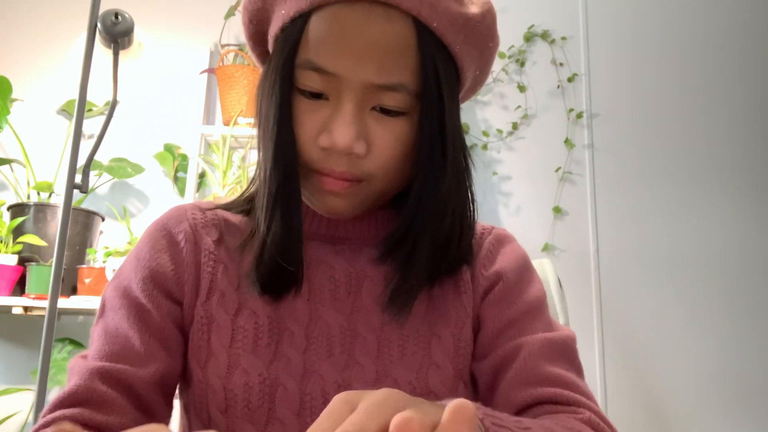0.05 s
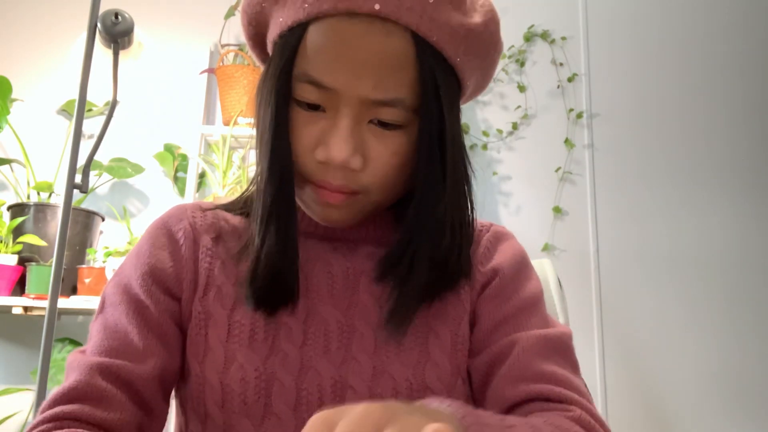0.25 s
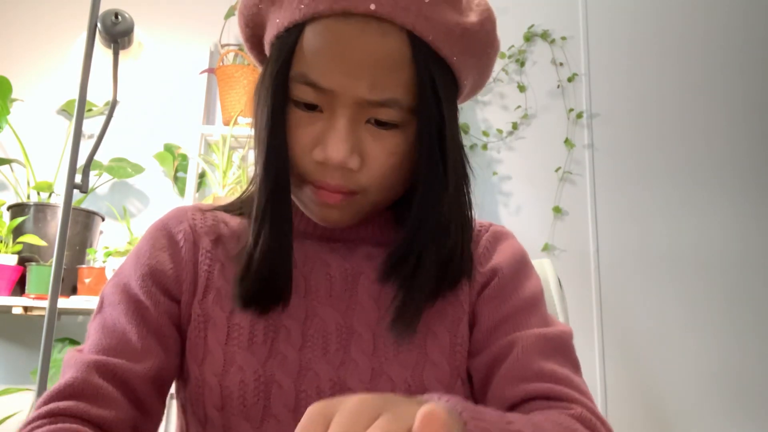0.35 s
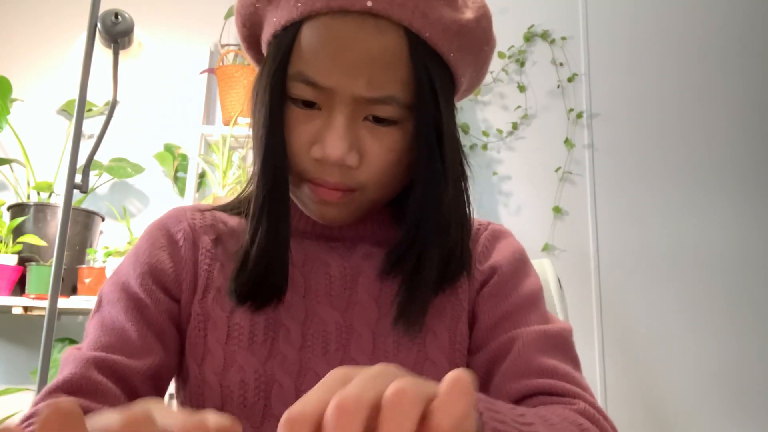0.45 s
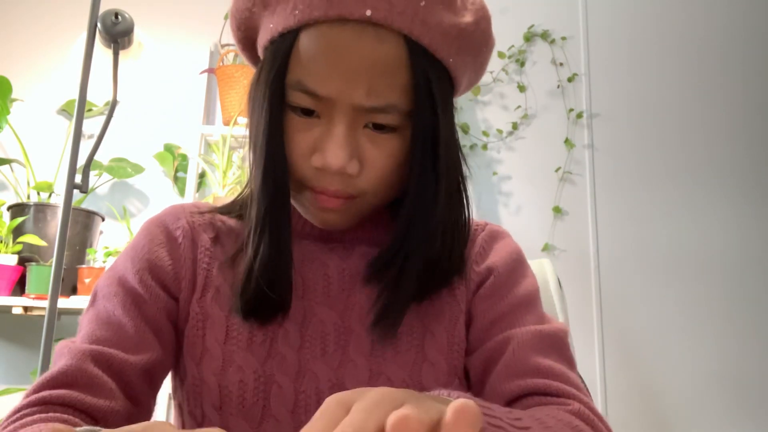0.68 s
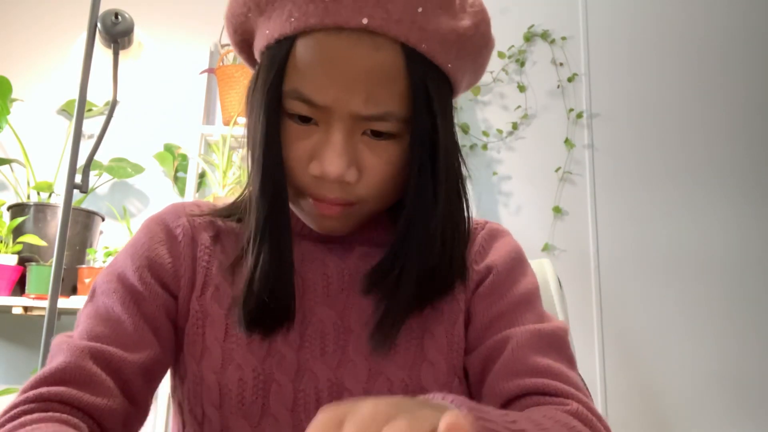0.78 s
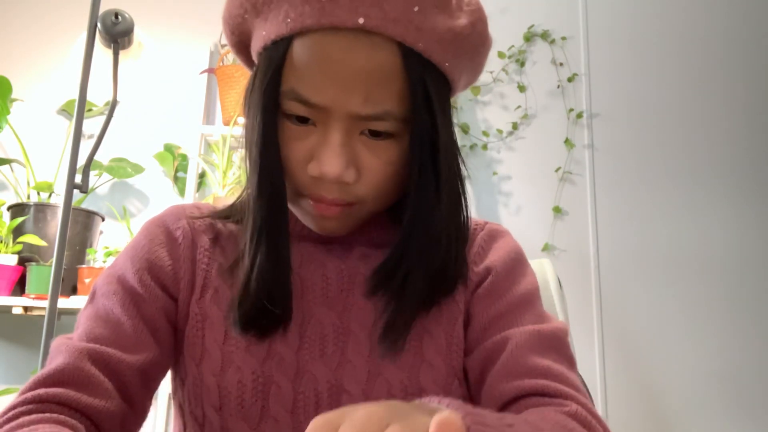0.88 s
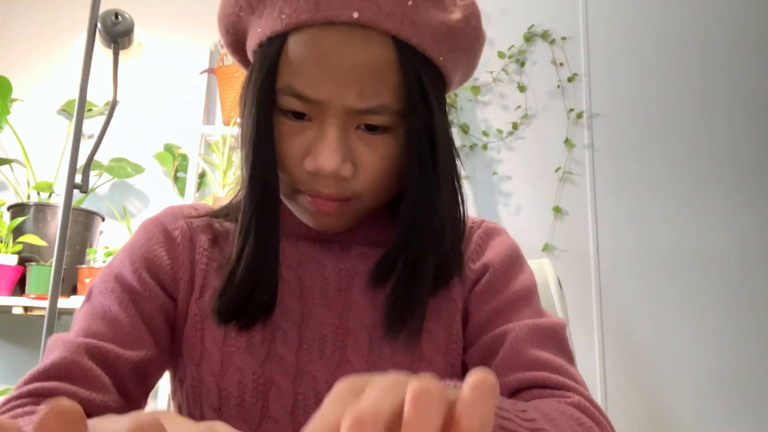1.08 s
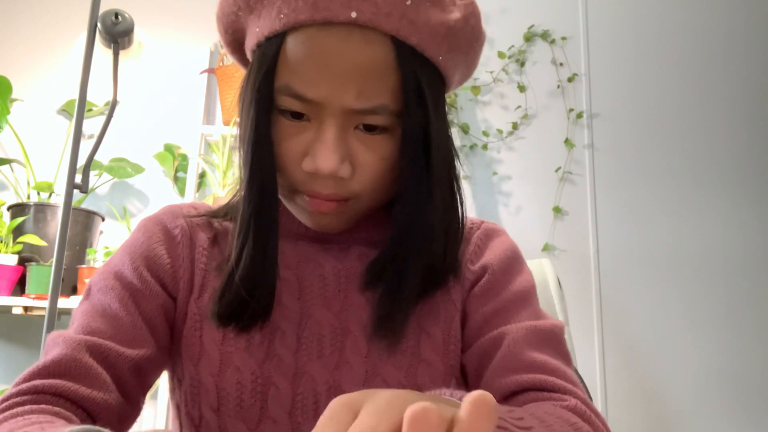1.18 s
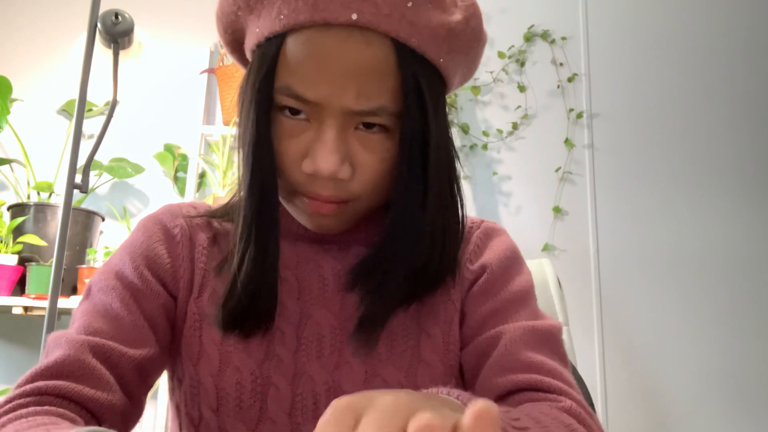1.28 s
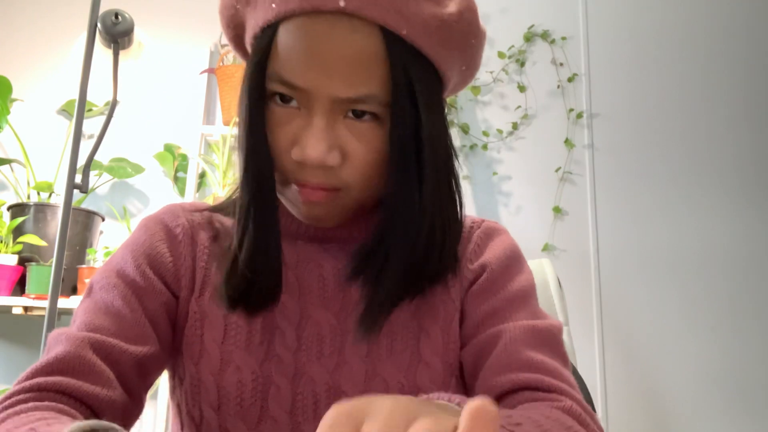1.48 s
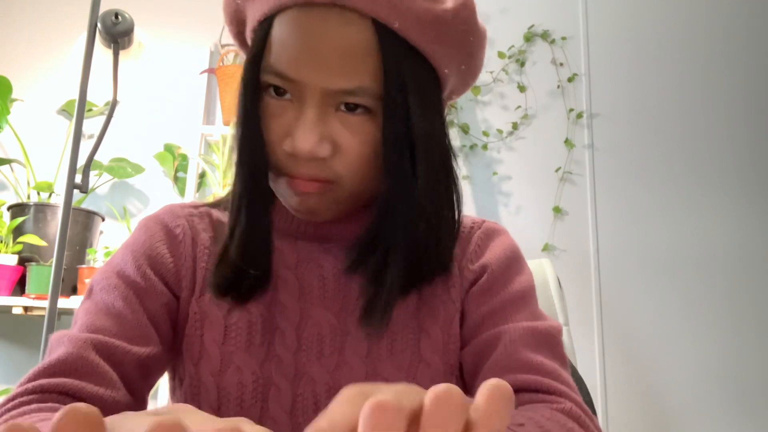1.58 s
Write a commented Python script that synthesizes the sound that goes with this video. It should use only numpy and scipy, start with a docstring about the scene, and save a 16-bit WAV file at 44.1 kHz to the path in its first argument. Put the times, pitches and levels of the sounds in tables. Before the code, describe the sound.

Hands slap down on a table three times, right beside the microphone, at about 0.2, 0.8 and 1.3 seconds. Each landing is a quick cluster of finger hits with a low thud, hollow knock and hard click. Soft finger bumps surround them, with faint nail ticks and skin brushes near 0.4 and 0.95 seconds and another brush near 1.5. The small quiet room rings faintly and low after each landing.

```python
"""Two hands land three times on a table, right beside the microphone, in a small quiet room.
Each landing is a cluster of finger contacts: the table's low modes thud, its higher modes give
a hollow knock, and a hard click sits on top. Around the landings the fingers settle with soft bumps,
nails tick and skin brushes off the surface. The room hums on in its low modes over a faint noise bed."""
import sys
import numpy as np
from scipy import signal
from scipy.fft import rfft, irfft, next_fast_len
from scipy.io import wavfile
from scipy.ndimage import uniform_filter1d

SR = 44100
rng = np.random.default_rng(int(sys.argv[2]) if len(sys.argv) > 2 else 0)


def int16_out(signal):
    """Quantize to a 16-bit WAV file."""
    q = np.round(np.clip(np.atleast_2d(signal).T, -1, 1) * 32767)
    wavfile.write(sys.argv[1], SR, q.astype(np.int16))


N = 72765


def undb(db):
    """Decibels to gain."""
    return 10 ** (np.asarray(db) / 20)


def along(hz, points):
    """Reads a curve of (freq_hz, value) points on a log-frequency axis."""
    freqs, values = np.array(points, float).T
    return np.interp(np.log(np.maximum(hz, 1)), np.log(freqs), values)


def shape(x, gain):
    """EQs x by a gain that is a function of frequency."""
    size = next_fast_len(2 * x.shape[-1])
    return irfft(rfft(x, size) * gain(np.fft.rfftfreq(size, 1 / SR)), size)[..., :x.shape[-1]]


def noise(eq, size):
    """Coloured stereo noise of rms 1."""
    x = shape(rng.standard_normal((2, size)), lambda f: undb(along(f, eq)))
    return x / x.std()


def level(x, db):
    """Sets the rms of the loudest 6 ms."""
    power = uniform_filter1d(np.atleast_2d(x ** 2).mean(0), size=265)
    return x * undb(db) / np.sqrt(power.max())


def add(out, x, start_s):
    """Mixes x into out at start_s."""
    i = max(int(start_s * SR), 0)
    out[..., i:i + x.shape[-1]] += x[..., :max(N - i, 0)]


def ring(modes, t, push_s, weight=np.ones_like, scatter_db=2, detune=0.011):
    """A smooth finger push rings the table's modes, a little differently at every spot."""
    hz, db, t60 = np.array(modes, float).T
    gain_draw, pitch_draw = rng.standard_normal((len(hz), 2)).T
    gain = undb(db + scatter_db * gain_draw) * weight(hz)
    tones = np.sin(2 * np.pi * np.outer(hz * (1 + detune * pitch_draw), t))
    decay = np.exp(-np.log(1000) * np.outer(1 / t60, t))
    attack = 1 - np.exp(-(t / push_s) ** 2)
    return gain @ (tones * decay) * attack


# The table's low modes: pitch_hz, gain_db, t60_s
TABLE_LOW_MODES = [(84.2, 0, 0.16), (99.3, -4.5, 0.096), (168.2, 7.5, 0.065), (200.1, -2, 0.15),
                   (260.4, -7.5, 0.13)]


def thud(t):
    """The weight of a contact: a slow push rings the table's low modes."""
    return ring(TABLE_LOW_MODES, t, push_s=0.0029)


# The table's higher, hollow modes: pitch_hz, gain_db, t60_s
TABLE_HIGH_MODES = [(306.5, -5, 0.11), (346, -5.5, .1), (402.4, -4, 0.05), (489.9, -11, 0.22),
                    (547.3, -1, 0.044), (614.7, 2, .05), (745.2, -4, 0.069), (780, -1, .035),
                    (900, 1.5, 0.018), (1046, -2, 0.029), (1154.3, -1.5, 0.027), (1256, -2.5, .024),
                    (1396, -7.5, 0.019), (1524, -13, 0.025), (1825, -14.5, .05)]


def knock(t, centre_hz, slap_db, slap_s, width_octaves=1.097, glide_octaves=.35):
    """The table's modes near centre_hz, plus a slap: forced swings under the finger, falling in pitch."""
    focus = lambda f: np.exp(-.5 * (np.log2(f / centre_hz) / width_octaves) ** 2)
    modes = ring(TABLE_HIGH_MODES, t, push_s=0.0008, weight=focus)
    glide = 2 * np.exp(-t / (2 * slap_s)) - 1  # from above the centre to below it
    pitch_hz = centre_hz * 2 ** (glide_octaves * glide)
    slap = np.sin(2 * np.pi * np.cumsum(pitch_hz) / SR) * t * np.exp(-2 * t / slap_s)
    return level(modes, 0) + level(slap, slap_db)


# Tone of the click's crack: freq_hz, gain_db
CRACK_EQ = [(900, -8), (1900, -1), (2500, -0.5), (3500, -1.5), (4500, -5), (6000, 2), (8200, -8.5),
            (10000, -12), (12500, -13), (16000, -29.5)]


def click(t, ring_hz, ring_db=-12.5, ring_s=0.0014, rise_s=.0006, decay_s=.0006):
    """The hard edge of a contact: a millisecond crack and the nail's short ring, left side first."""
    shared_power, right_lag_s = .6, .00023
    attack = 1 - np.exp(-(t / rise_s) ** 2)
    left, other = noise(CRACK_EQ, len(t)) * attack * np.exp(-t / decay_s)
    right = np.sqrt(shared_power) * left + np.sqrt(1 - shared_power) * other
    nail = undb(ring_db) * attack * np.exp(-t / ring_s) * np.sin(2 * np.pi * ring_hz * t)
    late_right = shape(right + nail, lambda f: np.exp(-2j * np.pi * f * right_lag_s))
    return np.array([left + nail, late_right])


def fingers(contacts, slap_db, give_s=0.00063):
    """Each finger clicks, then the table gives way; returns the table's motion and the airborne clicks."""
    t = np.arange(SR // 3) / SR
    body, clicks = np.zeros(N), np.zeros((2, N))
    for start_s, thud_db, knock_db, knock_hz, click_db, slap_s, ring_hz in contacts:
        low = level(thud(t), thud_db)
        hollow = level(knock(t, knock_hz, slap_db, slap_s), knock_db)
        add(body, low + hollow, start_s + give_s)
        add(clicks, level(click(t[:len(t) // 4], ring_hz), click_db), start_s)
    return body, clicks


def skin_drag(clicks, smear_db=3.5, smear_s=.008, lowpass_hz=4500):
    """Skin rubs on briefly after a soft touch, smearing and dulling its edge."""
    t = np.arange(SR // 12) / SR
    tail = rng.standard_normal((2, len(t))) * np.exp(-t / smear_s)
    tail /= np.sqrt(np.sum(tail ** 2) / 2)
    smear = signal.fftconvolve(clicks, tail, axes=1)[:, :N]
    return shape(clicks + undb(smear_db) * smear, lambda f: 1 / (1 + (f / lowpass_hz) ** 4))


# Light touches, levels before the skin drag: start_s, thud_db, knock_db, knock_hz, click_db
SOFT_TOUCHES = [ (.001, -61, -47, 599.5, -63), (.029, -54, -69.5, 350, -89.5),
                (0.099, -94.5, -60.5, 1100, -97.5), (0.1369, -68.5, -46, 750, -63),
                (.146, -50.5, -43, 520, -101.5), (0.158, -52.5, -41.5, 500, -94.5),
                (0.4102, -46.5, -38.5, 820, -55.5), (.4505, -64, -44, 850, -77),
                (.468, -64, -46.5, 850, -81), (.490, -58, -52.5, 900, -89),
                (.564, -62.5, -52.5, 950, -72.5), (0.572, -56.5, -42, 550, -68),
                (.580, -51, -46.5, 750, -66.5), (0.601, -62.5, -56.5, 450, -78),
                (0.686, -79, -76, 850, -84), (0.7449, -73.5, -60.5, 850, -65), (.760, -54, -45, 440.4, -84),
                (1.1206, -60.5, -49.5, 780, -64), (1.141, -49, -46.5, 1050, -61),
                (1.153, -56, -50, 452, -75.5), (1.289, -52.5, -46.5, 850, -71.5),
                (1.641, -57.5, -55, 900, -66)]


def soft_bumps(slap_s=0.0039, ring_hz=2840):
    """The hands lift and settle: gentle contacts with hardly any slap and a blurred click."""
    body, clicks = fingers([(*touch, slap_s, ring_hz) for touch in SOFT_TOUCHES], slap_db=-9)
    return body, skin_drag(clicks)


# Finger hits of the landings: start_s, thud_db, knock_db, knock_hz, click_db, slap_s, ring_hz
FINGER_HITS = [ (.2033, -46, -25.5, 720, -55, 0.0046, 2850),
               (.2103, -33.5, -10.5, 800, -25.5, 0.00072, 7340), (.2180, -21, -8, 882.7, -28, 0.0023, 3900),
               (.2376, -26.5, -16, 877, -23.5, 0.002, 3620), (.2458, -22, -19, 561, -38, .002, 3400),
               (.2501, -25, -16.5, 950, -25.5, 0.0014, 6350), (.2575, -32, -23, 410.7, -42, 0.0043, 4800),
               (.7678, -48.5, -26.5, 800, -48, 0.0015, 5800), (.7781, -33, -16, 823, -20.5, 0.0026, 3580),
               (.7817, -38, -8, 972, -21.5, 0.0015, 3256), (.7957, -31.5, -19.5, 663, -22, 0.0018, 4015),
               (.8027, -23, -22, 356.6, -26.5, 0.0029, 4350),
               (.8230, -31.5, -27.5, 410.4, -53.5, .004, 4500),
               (1.2990, -36.5, -25.5, 643, -44, 0.0037, 5620),
               (1.3095, -51, -12.5, 900, -15.5, 0.0011, 5510),
               (1.3152, -27.5, -10, 432.6, -29, 0.0022, 6500), (1.3295, -29, -8, 758, -25, .0018, 3400)]


def landings():
    """Both hands come down three times, each a tight cluster of fingers slapping the table."""
    return fingers(FINGER_HITS, slap_db=2.5)


# The room's standing waves: pitch_hz, send_db, t60_s
STANDING_WAVES = [(130.4, -31, 1), (202.6, -31, 1.1)]


def room_hum(body):
    """The room's low modes store a share of each landing's energy and hum it away."""
    t, out = np.arange(N) / SR, 0
    for hz, send_db, t60 in STANDING_WAVES:
        retained = np.exp(-2 * np.log(1000) / (t60 * SR))
        energy = signal.lfilter([1 - retained], [1, -retained], body ** 2)
        tone = np.sin(2 * np.pi * (hz * t + rng.random()))
        out = out + undb(send_db) * np.sqrt(2 * energy) * tone
    return out


# Fingernail ticks as the hands lift: start_s, level_db
NAIL_TICKS = [(.3685, -61), (.401, -55.5), (.9535, -62)]


def nail_ticks(ring_hz=6500):
    """Nails tick too lightly to move the table."""
    t, out = np.arange(SR // 12) / SR, np.zeros((2, N))
    for start_s, db in NAIL_TICKS:
        add(out, level(click(t, ring_hz), db), start_s)
    return out


# Fingers brushing off the surface: end_s, length_s, level_db
BRUSH_STROKES = [(0.397, 0.024, -50.5), (0.952, .022, -51), (1.498, 0.033, -54.5)]
# Tone of sliding skin: freq_hz, gain_db
SKIN_EQ = [(400, 5), (1200, 7), (1800, -8.5), (2500, -8), (4200, -0.5), (5500, -11), (6500, -0.5),
           (8000, -16.5), (12500, -19.5), (16000, -32)]


def brushes(swell_db=4, fade_s=0.0065, grain_depth=0.17):
    """Skin slides off the surface: a grainy hiss that swells and stops."""
    t, envelope = np.arange(N) / SR, 0
    for end_s, length_s, db in BRUSH_STROKES:
        attack = np.clip((t - end_s + length_s) / fade_s, 0, 1)
        swell = undb(db + swell_db * np.minimum((t - end_s) / length_s, 0))
        release = np.exp(-np.maximum(t - end_s, 0) / fade_s)
        envelope = envelope + attack * swell * release
    grain = uniform_filter1d(rng.standard_normal(N), size=60)
    roughness = np.exp(grain_depth * grain / grain.std() - grain_depth ** 2)
    return envelope * noise(SKIN_EQ, N) * roughness


# Phase of the table's sound between the microphone ports: freq_hz, left_lead_rad
LEFT_LEAD = [(40, 1.55), (150, 0.2), (300, -2.03), (520, -1), (750, -3), (1030, -5.5), (1300, -4.5),
             (2000, -2.5)]


def mic_ports(body, size=512):
    """The table's motion reaches the left port out of step with the right, by a few ms at most."""
    turn = np.exp(1j * along(np.fft.rfftfreq(size, 1 / SR), LEFT_LEAD))
    taps = np.roll(irfft(turn), size // 2) * signal.get_window("hann", size)
    left = signal.fftconvolve(body, taps)[size // 2:size // 2 + N]
    return np.array([left, body])


# Bands of the room's wash: centre_hz, send_db, t60_s
WASH_BANDS = [(70, -15.5, .5), (140, -13, 1), (274, -8.5, .36), (560, -21, .33), (1100, -17, 0.26),
              (2220, -10.5, 0.18), (4500, -14.5, 0.21), (9000, -23.5, 0.33), (16000, -15, .15)]


def room_reverb(direct, build_s=.012, early_db=-8.5, early_s=0.0077):
    """The small room returns near reflections and a wash that dies sooner in the treble."""
    t = np.arange(SR) / SR
    white, early = rng.standard_normal((2, 2, SR))
    build = 1 - np.exp(-(t / build_s) ** 2)
    unit_energy = lambda e: e / np.sqrt(np.sum(e ** 2))
    response = undb(early_db) * early * unit_energy(build * np.exp(-t / early_s))
    for centre_hz, send_db, t60 in WASH_BANDS:
        crossover = [(hz, hz == centre_hz) for hz, _, _ in WASH_BANDS]
        band = shape(white, lambda f: along(f, crossover))
        response += undb(send_db) * band * unit_energy(build * np.exp(-np.log(1000) * t / t60))
    return signal.fftconvolve(direct, response, axes=1)[:, :N]


# Stereo lean across the spectrum: freq_hz, left_minus_right_db
PAN_CURVE = [(40, -6), (70, 5), (170, 4.5), (350, 1), (700, 6.5), (1300, 0.5), (2700, -6), (5500, -0.5),
             (9000, -4), (14000, 0)]
# Tone of the bass-heavy noise bed: freq_hz, gain_db
BED_EQ = [(30, -4.5), (70, 2.5), (180, 7.5), (400, -16), (900, -18.5), (1800, -25.5), (5000, -28.5),
          (14000, -30), (16000, -48)]


def scene(bed_db=-68):
    """Table, clicks, ticks and brushes sound in the room, panned by frequency over a steady noise bed."""
    landing_body, landing_clicks = landings()
    bump_body, bump_clicks = soft_bumps()
    table = mic_ports(landing_body + bump_body)
    direct = table + landing_clicks + bump_clicks + brushes() + nail_ticks()
    in_room = direct + room_reverb(direct) + room_hum(landing_body)
    panned = shape(in_room, lambda f: undb(np.outer([.5, -.5], along(f, PAN_CURVE))))
    return panned + noise(BED_EQ, N) * undb(bed_db)


def record(dry):
    """The microphone thins the deep bass, rounds the highest peaks and cuts the top."""
    low_cut_hz, high_cut_hz, ceiling = 59.3, 15900, .95
    thinned = signal.sosfilt(signal.butter(2, low_cut_hz, "high", fs=SR, output="sos"), dry)
    rounded = thinned / (1 + (thinned / ceiling) ** 6) ** (1 / 6)
    return signal.sosfilt(signal.ellip(8, .2, 80, high_cut_hz, fs=SR, output="sos"), rounded)


dry = scene()
out = record(dry)
int16_out(out)
```